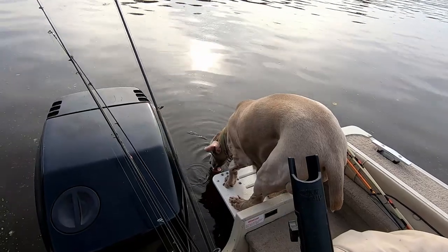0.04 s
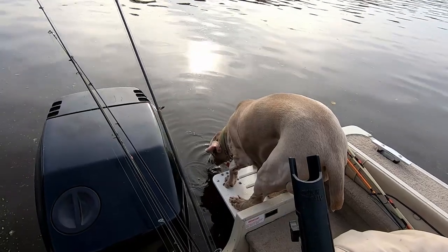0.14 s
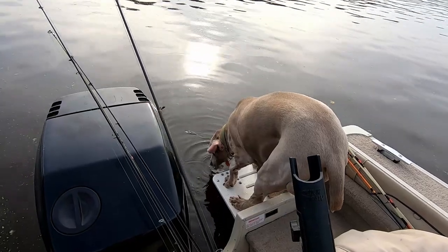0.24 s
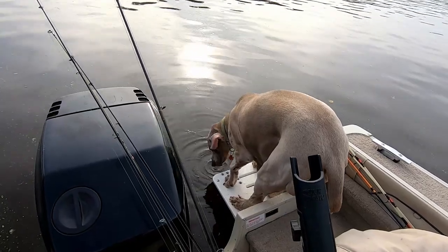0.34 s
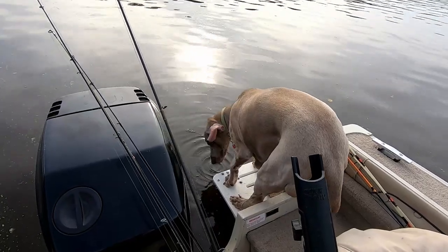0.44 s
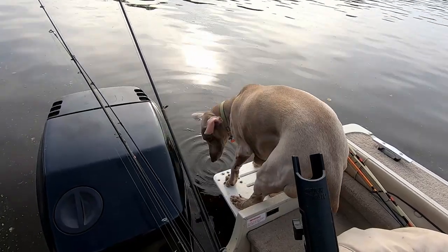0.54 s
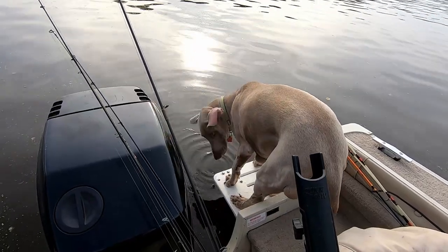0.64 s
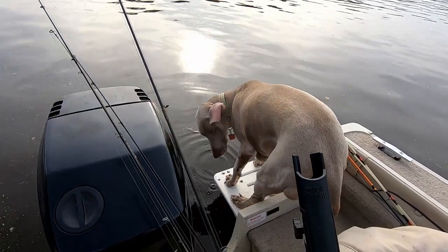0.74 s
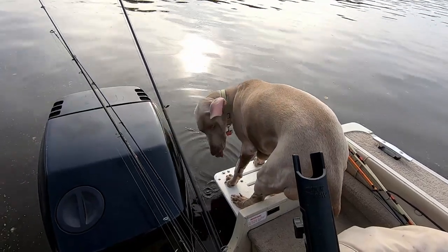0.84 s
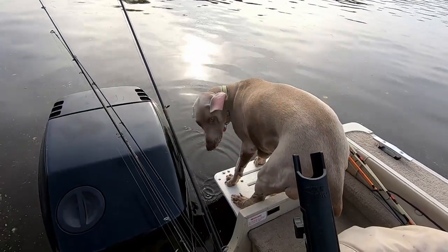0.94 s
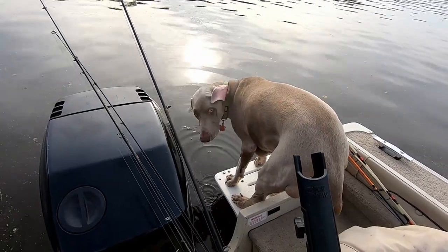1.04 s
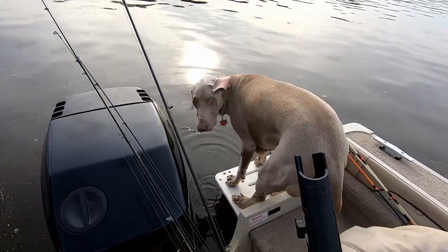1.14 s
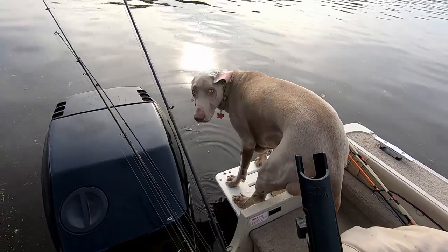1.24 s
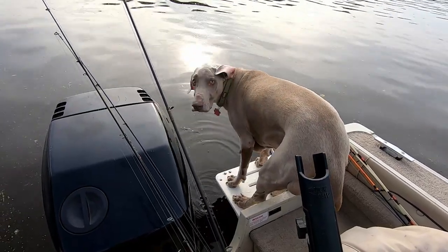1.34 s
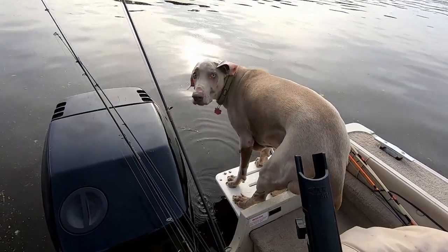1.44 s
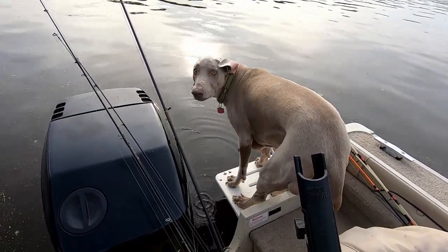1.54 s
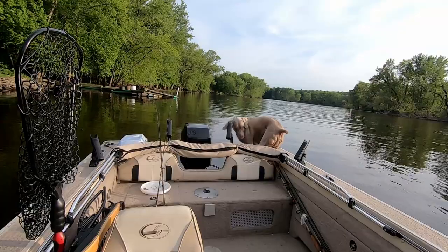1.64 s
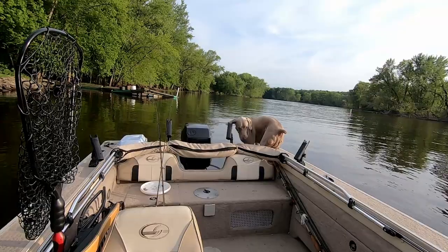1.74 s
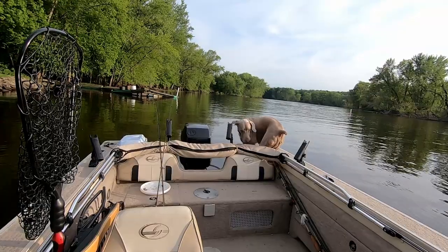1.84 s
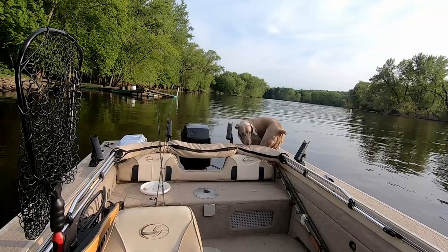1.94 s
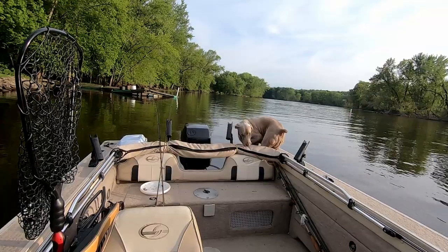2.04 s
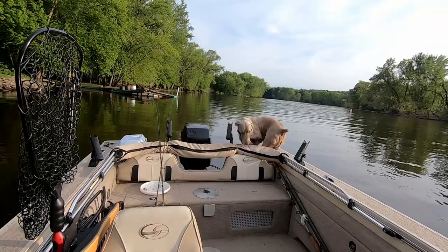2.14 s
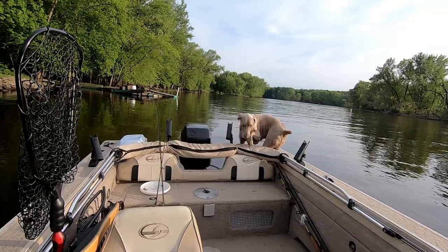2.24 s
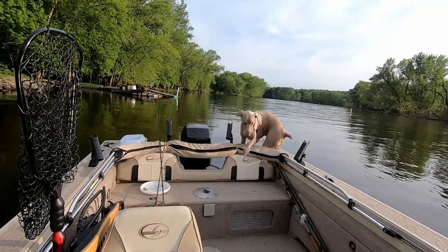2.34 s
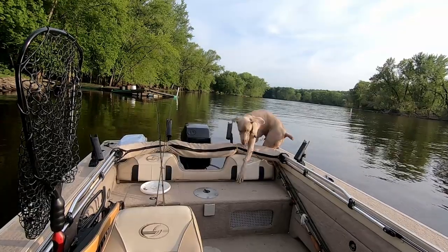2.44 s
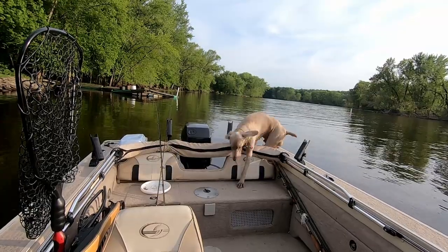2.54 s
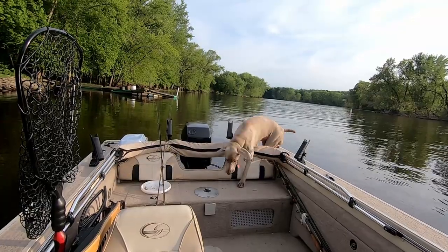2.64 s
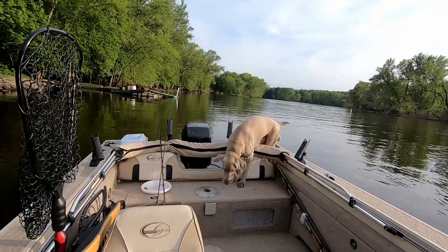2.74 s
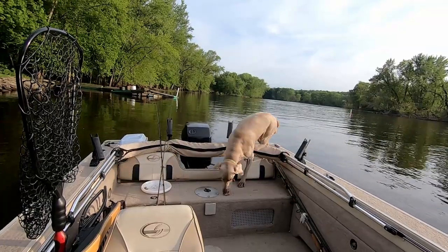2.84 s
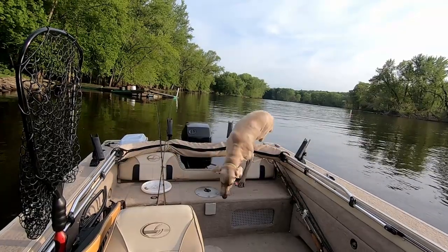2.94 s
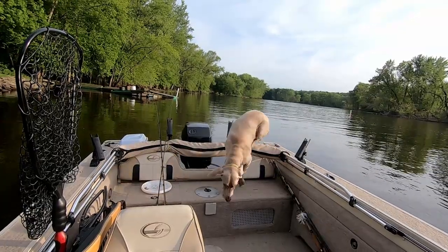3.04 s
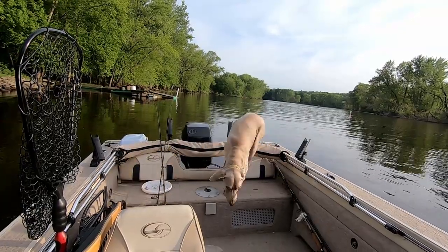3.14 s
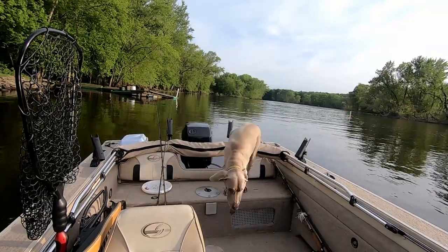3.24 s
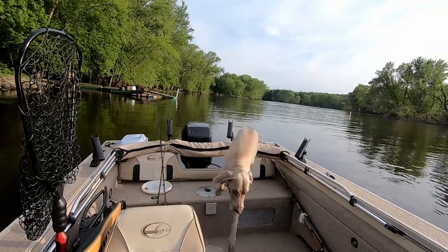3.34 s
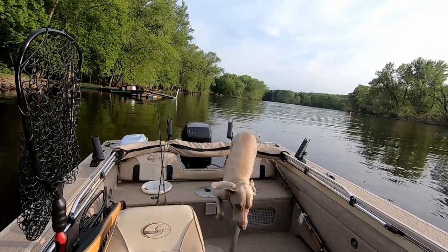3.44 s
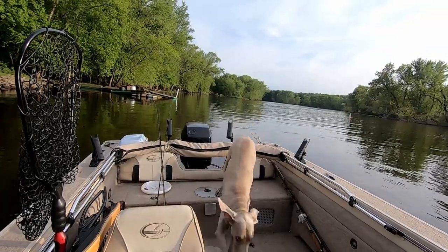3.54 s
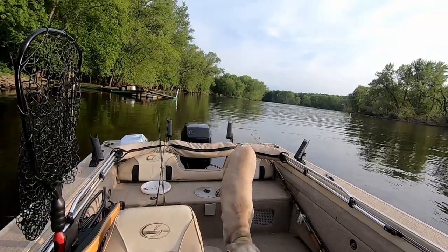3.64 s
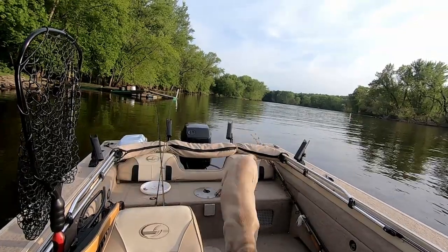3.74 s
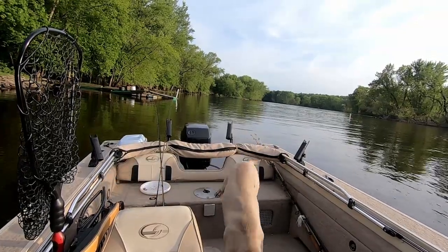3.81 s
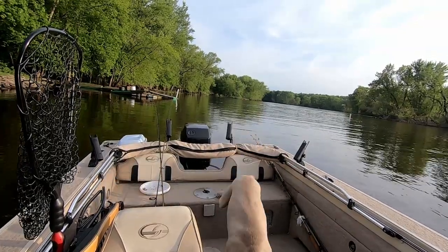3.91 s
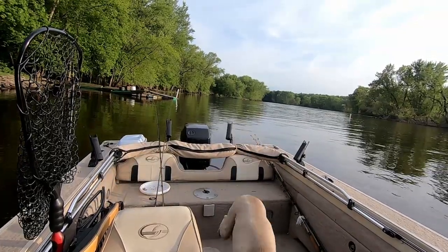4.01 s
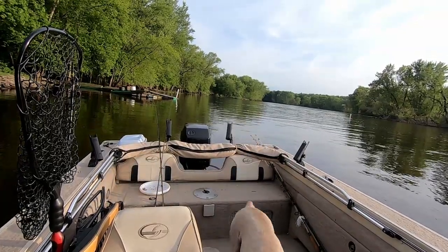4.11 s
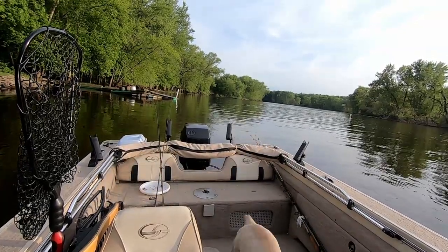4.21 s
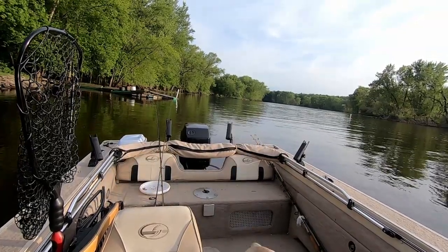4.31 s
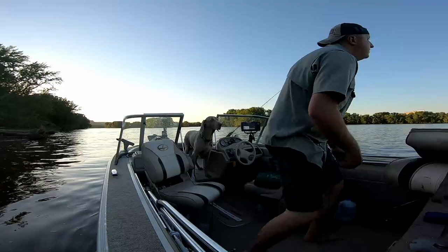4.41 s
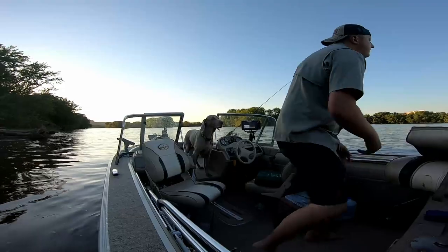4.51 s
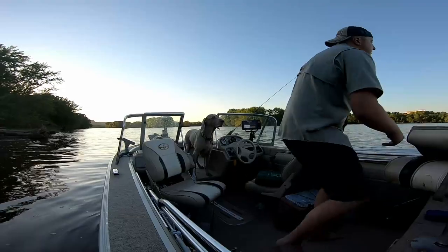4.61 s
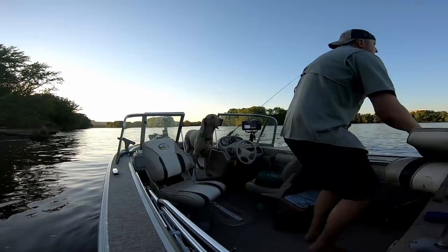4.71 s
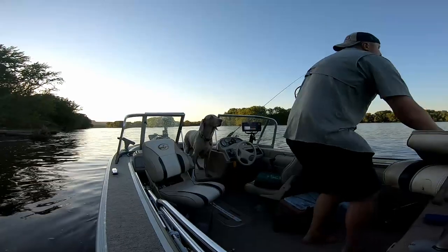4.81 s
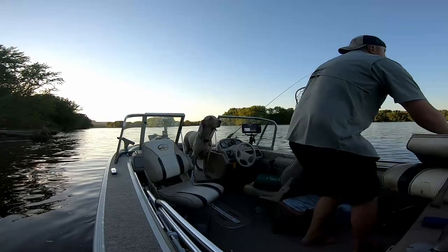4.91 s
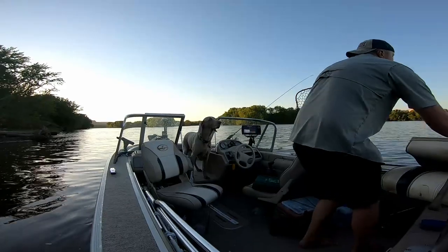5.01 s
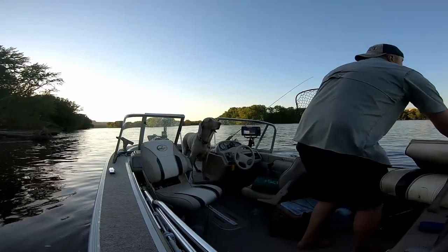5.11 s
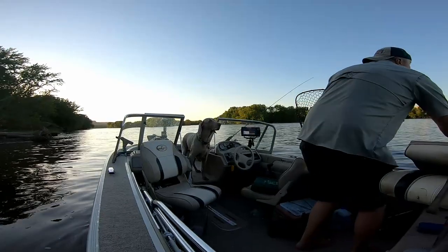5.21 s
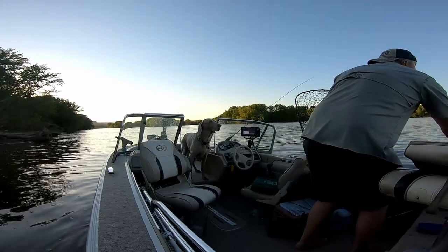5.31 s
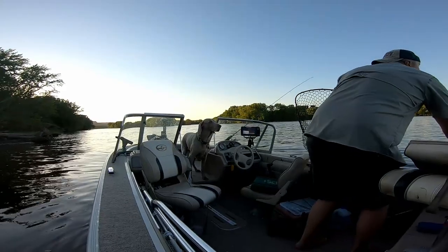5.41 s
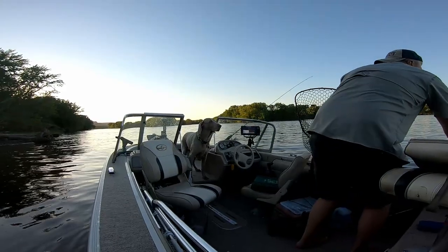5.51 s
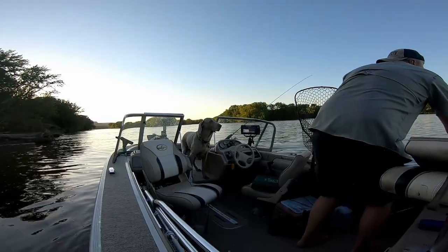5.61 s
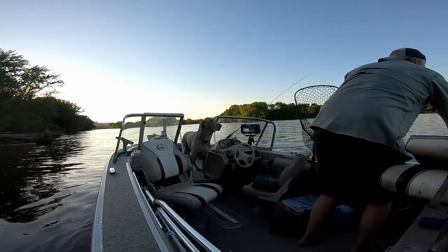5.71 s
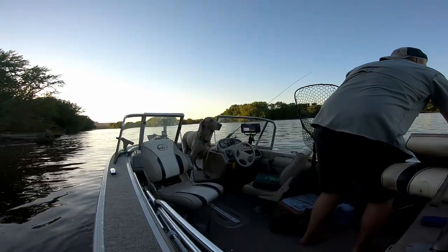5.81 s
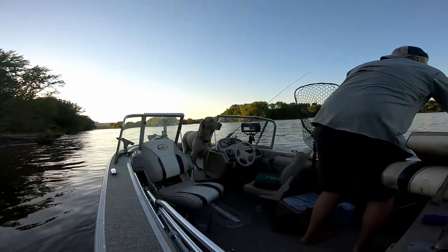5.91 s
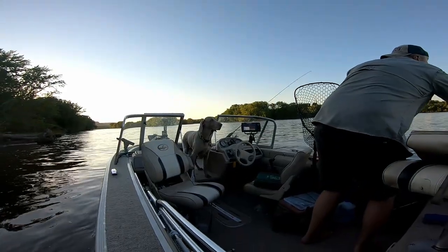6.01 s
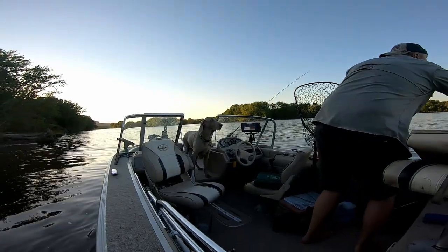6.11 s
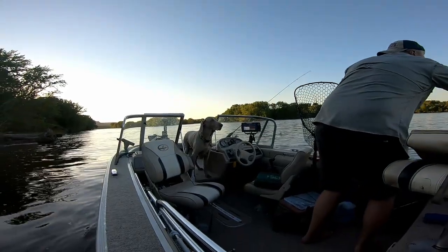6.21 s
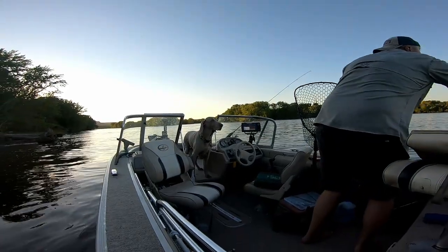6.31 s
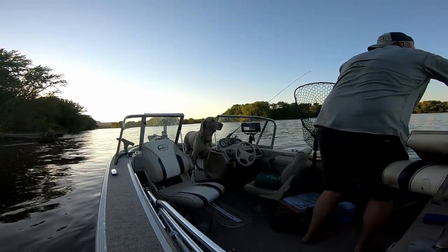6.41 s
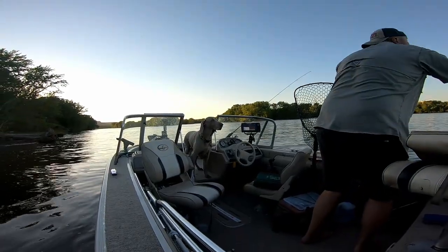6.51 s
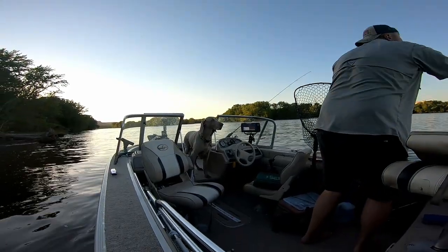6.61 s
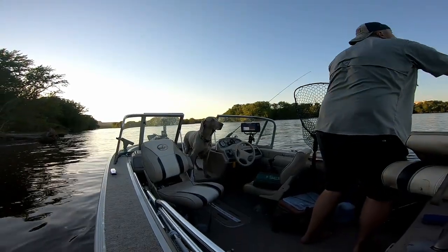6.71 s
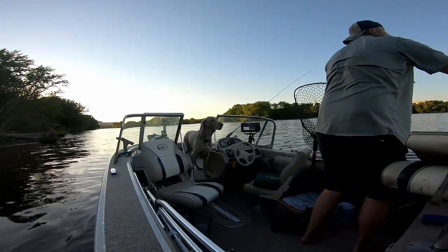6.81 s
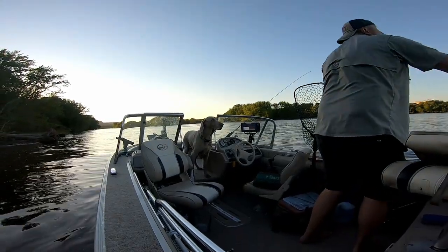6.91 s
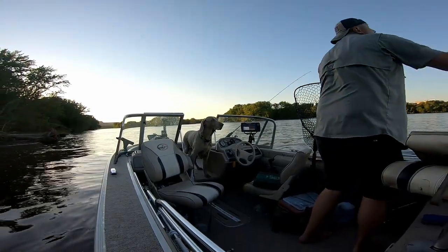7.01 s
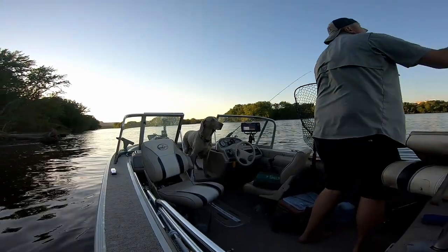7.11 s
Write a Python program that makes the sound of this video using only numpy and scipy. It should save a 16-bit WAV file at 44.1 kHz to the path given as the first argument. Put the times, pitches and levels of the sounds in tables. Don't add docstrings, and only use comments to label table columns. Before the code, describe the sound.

Three outdoor river places heard in turn from a microphone at arm's length: first wet lapping, bubbles and trickling drips over a soft distant engine; then birds, faint frogs, tag chinks, and a dog jumping down with a burst of bright claw ticks, scrapes and hollow thumps; finally a louder low engine hum through the hull, with water wash and little else.

```python
import sys
import numpy as np
from scipy import signal
from scipy.fft import rfft, irfft, next_fast_len
from scipy.io import wavfile
from scipy.ndimage import uniform_filter1d, map_coordinates

SR = 44100
rng = np.random.default_rng(int(sys.argv[2]) if len(sys.argv) > 2 else 0)


def pcm_store(signal):
    levels = np.round(np.clip(np.atleast_2d(signal), -1, 1) * 32767)
    wavfile.write(sys.argv[1], SR, levels.astype(np.int16).T)


def gain_from_db(level_db):
    decades = np.asarray(level_db, float) / 20
    return 10 ** decades


N = 315315

# [s] stern to cove, [s] cove to bow.
CUTS = (1.612, 4.445)


def evened(x):
    return x / np.sqrt(np.mean(x ** 2) + 1e-20)


def curve(rows, column=1):
    return np.interp(np.arange(N) / SR, [r[0] for r in rows], [r[column] for r in rows])


def read(points, hz):
    f, value = np.transpose(points)
    return np.interp(np.log(hz + 1), np.log(f + 1), value)


def span(start_s, end_s):
    return slice(max(round(start_s * SR) - 500, 0), min(round(end_s * SR) + 500, N))


def between(start_s, end_s):
    t = np.arange(N) / SR
    return np.clip(np.minimum(t - start_s, end_s - t) / 0.0042 + .5, 0, 1)


def add(mix, s, sound, pan_db, spread=0., size=0):
    part = mix[:, round(s * SR):][:, :len(sound)]
    fade = gain_from_db(-60 * np.arange(200) / SR / 0.0042)
    walls = rng.standard_normal((2, 200)) * fade
    direct = np.arange(200) == [[size], [0]]
    walls = spread * walls / np.linalg.norm(walls[0]) + direct
    pair = signal.fftconvolve(sound[None], walls, axes=1) * gain_from_db([[pan_db / 2], [-pan_db / 2]])
    part += pair[:, :part.shape[1]] / np.sqrt(1 + spread ** 2)


def bandpass(lo_hz, hi_hz):
    return signal.butter(2, [lo_hz, min(hi_hz, .49 * SR)], "band", fs=SR, output="sos")


def band(x, lo_hz, hi_hz):
    return signal.sosfilt(bandpass(lo_hz, hi_hz), x)


def steep(x, lo_hz, hi_hz):
    once = bandpass(lo_hz, hi_hz)
    return evened(signal.sosfilt(np.vstack([once, once]), x))


def wander(per_s):
    steps = rng.standard_normal(int(N / SR * per_s) + 9)
    coarse = np.arange(0, N + 64, 64)
    smooth = map_coordinates(steps, [coarse / SR * per_s + 2], order=3)
    return np.interp(np.arange(N), coarse, evened(smooth))


def grains(per_s, size_db, count):
    sizes = gain_from_db(size_db * np.minimum(rng.exponential(1, count), 4))
    sizes = sizes * (rng.random(count) < per_s / SR)
    shared, own = rng.standard_normal(count), rng.standard_normal((2, count))
    return (shared + 3.8 * own) * sizes


def bubble(hz, splash_db, t60):
    t = np.arange(2000) / SR
    noise = rng.standard_normal((2, len(t)))
    clear = np.clip(600 / hz, 0, .8)
    tone = clear * np.sin(2 * np.pi * hz * (t + 1.2 * t ** 2))
    tone = tone + (1.2 - clear) * steep(noise[0], .91 * hz, 1.1 * hz)
    swell = np.minimum(t * hz / 2.6, 1) ** 1.9
    splash = gain_from_db(splash_db + 8.0) * steep(noise[1], 610, 5730) * gain_from_db(-60 * t / 0.24)
    fall = gain_from_db(-60 * t / np.clip(t60, .01, .4)) * np.minimum(t / 0.0018, 1)
    broken = gain_from_db(4.0 * (1 - clear) * evened(uniform_filter1d(noise[1], size=70)))
    sound = (tone * swell + splash) * fall * broken
    return sound / abs(sound).max()


# start in [s], peak in [dB], bubble pitch in [Hz].
LAPS = [(0.167, -36.5, 690), (0.182, -42, 574), (0.231, -42, 640), (0.262, -49, 704), (0.548, -41.5, 1320),
        (0.554, -40.5, 3140), (0.628, -42.5, 3080), (0.703, -37, 3540), (0.754, -53, 603),
        (0.88, -46.5, 560), (1.005, -48, 2000), (1.044, -45.5, 595), (1.169, -32.5, 3400),
        (1.183, -43.5, 3810), (1.511, -41, 2900), (1.569, -44.5, 690)]
# start in [s], peak in [dB],
# bubble pitch in [Hz].
DROPS = [(0.078, -45, 1330), (0.314, -32, 1268), (0.326, -33.5, 3240), (0.486, -47.5, 3740),
         (0.586, -40.5, 3140), (0.68, -42.5, 3130), (0.964, -47, 2170), (1.022, -43.5, 820),
         (1.105, -45.5, 3480), (1.118, -52, 3480), (1.06, -51, 595), (1.11, -45.5, 590), (1.135, -51, 570),
         (1.045, -51, 2170), (1.05, -50, 3300), (1.075, -49, 3200), (1.207, -40.5, 2370),
         (1.281, -36.5, 764), (1.418, -47.5, 2390), (1.501, -40.5, 3330), (1.539, -44, 2750),
         (0.004, -54, 1180), (0.092, -50.5, 1510), (0.153, -50, 1240), (0.196, -58, 2100),
            (0.267, -48, 4070), (0.2884, -52, 3460), (0.329, -46, 2180), (0.503, -60, 1200),
            (0.541, -50, 1040), (0.554, -47, 6200), (0.598, -44, 2840), (0.65, -64, 9500),
            (0.709, -52, 1180), (0.709, -46, 6200), (0.731, -54, 2370), (0.751, -51, 7440),
            (0.855, -56, 1270), (0.87, -56, 930), (1.034, -46, 1460), (1.07, -52.5, 1270),
            (1.094, -49, 3470), (1.11, -53, 1380), (1.131, -59, 1350), (1.19, -52, 1480),
            (1.231, -53, 1230), (1.255, -53, 2100), (1.262, -56, 4770), (1.292, -48, 1260),
            (1.5, -53, 1220), (1.525, -56, 720), (1.599, -52.5, 2480)]
# time in [s], level in [dB].
TRICKLE = [(0, -68.5), (.14, -67.5), (.2, -63), (.36, -63), (.52, -69), (.6, -56), (.66, -62.5), (.85, -59),
           (.98, -59.5), (1.03, -58), (1.14, -60), (1.22, -62), (1.32, -79), (1.48, -75), (1.52, -58.5),
           (1.6, -60)]


def water():
    out, t, count = np.zeros((2, N)), np.arange(900) / SR, 2 * SR
    for rows, splash_db in ((LAPS, -6), (DROPS, -38)):
        for s, db, hz in rows:
            t60 = 0.065 * min(1300 / hz, 1) ** 0.33
            add(out, s, gain_from_db(db) * bubble(hz, splash_db, t60), -.8, .3)
    trickle, drops, kind = np.zeros((2, count)), grains(2500, 3.5, count), rng.integers(0, 32, count)
    for k, hz in enumerate(np.geomspace(450, 7500, num=32) * 0.85):
        fizz = np.sin(2 * np.pi * hz * (t + 4.2 * t ** 2)) * t * hz * np.exp(-t * hz / 4.3)
        fizz *= (hz / 3000) ** 0.2
        trickle += signal.oaconvolve(drops * (kind == k), fizz[None])[:, :count]
    hiss = rng.standard_normal(count) + .5 * rng.standard_normal((2, count))
    rustle = steep(hiss, 1300, 5600) * gain_from_db(-1.5 + 3.4 * wander(59.94))[:count]
    flow = gain_from_db(curve(TRICKLE) - 5.5) * between(-1, CUTS[0])
    out[:, :count] += (evened(trickle) + rustle) * flow[:count]
    return out


def claw(hz, treble_db):
    t = np.arange(2600) / SR
    noise = rng.standard_normal((3, len(t))) + 4. * (t == 0)
    luck = rng.standard_normal((5, 2))
    pitches = hz * np.array([.7, .9, 1, 1.2, 1.45]) * (1 + .04 * luck[:, 1])
    sines = np.sin(2 * np.pi * np.outer(np.clip(pitches, 1000, 9000), t))
    modes = (gain_from_db(1.5 * luck[:, 0]) * [.6, .8, 1.2, .7, .5]) @ sines
    body = evened(modes) * gain_from_db(-60 * t / 0.075)
    body += gain_from_db(-3.0) * steep(noise[0], min(0.51 * hz, 1700), min(2.42 * hz, 7000))
    body += gain_from_db(treble_db - 9.0) * steep(noise[1], 7000, 15000) * np.minimum(t / 0.006, 1)
    body += gain_from_db(-15) * steep(noise[2], 670, 1910) * np.minimum(t / 0.0047, 1)
    rattle_db = 3.2 * evened(uniform_filter1d(noise[2], size=60))
    fall = gain_from_db(-60 * t / 0.016) + gain_from_db(-8.5 - 60 * t / 0.085 + rattle_db)
    sound = body * fall * np.minimum(t / 0.0006, 1)
    return sound / abs(sound).max()


# start in [s], peak
# in [dB], brightest pitch in [Hz].
CLAWS = [(2.7756, -37.5, 1520), (2.794, -32, 3520), (2.8209, -31, 2230), (2.83, -31.5, 3140),
         (2.845, -34.5, 2340), (2.852, -36, 3200), (2.879, -29.5, 3150), (2.904, -19, 3540),
         (2.944, -32, 4550), (2.9634, -12.5, 3710), (2.969, -18, 3120), (2.991, -20.5, 3200),
         (2.999, -16.5, 4070), (3.0091, -17.5, 2970), (3.019, -23, 2390), (3.0302, -21.5, 3580),
         (3.06, -30, 1780), (3.1067, -24, 2050), (3.141, -35, 2570), (3.1555, -10, 5560),
         (3.1754, -19, 3125), (3.1796, -20.5, 2400), (3.2124, -19, 5640), (3.217, -22.5, 2520),
         (3.233, -20, 3365), (3.2972, -21, 4110), (3.3466, -23, 4100), (3.3613, -25.5, 3160),
         (3.399, -24.5, 2840), (3.4278, -33.5, 3500), (3.462, -33, 3200),
         (2.394, -42, 2400), (2.477, -40, 3050), (2.5238, -45, 3350), (3.51, -42.5, 2980),
         (3.5631, -35, 3520), (3.7592, -41, 2890), (4.065, -36, 1400), (4.2054, -27, 2500),
         (4.293, -57, 890),
         (1.777, -48, 3010), (2.362, -44.5, 4330), (2.635, -59, 6000), (2.764, -51, 3830),
           (2.886, -28, 4600), (2.912, -30, 4460), (2.984, -20.5, 2860), (3.04, -29, 2810),
           (3.089, -37, 3080), (3.172, -32, 3500), (3.187, -36, 3000), (3.248, -24, 4030),
           (3.304, -24.5, 2660), (3.321, -38, 4520), (3.337, -37, 2320), (3.349, -30, 2530),
           (3.377, -35, 3450), (3.407, -30.5, 2790), (3.438, -36.5, 2960), (3.493, -44, 4000),
           (3.548, -42.5, 1490), (3.695, -52, 6700), (3.706, -45, 6160), (4.029, -46, 5770),
           (4.136, -48.5, 3930), (4.222, -51, 4000), (4.256, -46, 6560), (4.435, -52, 7550)]
# start in [s], peak in [dB], brightest pitch in [Hz].
TACKLE = [(4.576, -51, 4900), (4.96, -57, 5500), (5.0, -55, 4510), (5.19, -51, 5060), (5.8777, -46.5, 4400),
          (6.47, -58, 5000)]
# time in [s], level in [dB].
SCRAPE = [
    [(2.74, -56), (2.85, -48), (2.93, -50.5), (3.02, -38.5), (3.08, -53), (3.2, -41.5), (3.28, -58),
     (3.37, -55.5), (3.53, -78)],
    [(3.95, -69), (3.98, -50), (4.07, -60), (4.16, -58)],
    [(4.3, -62), (4.4, -70), (4.425, -55.5), (4.445, -53.5)],
]
# frequency in [Hz], level in [dB per Hz].
DECK = [(290, -25), (500, 1), (657, -6), (792, 1), (1510, 1), (5920, -15.5), (12000, -34), (15500, -44.5)]
# frequency in [Hz], level in [dB].
PORT_DB = [(200, -2), (380, 0.5), (700, -8.5), (1290, -9.5), (2380, -6.5), (4400, -3), (8120, -5),
           (15000, -1)]
# frequency in [Hz], lead in [radians].
PORT_LEAD = [(300, 0), (780, 0.4), (1290, 2), (1810, 1.0), (2670, 0.54), (3960, -0.15), (5000, -1.56),
             (7320, -1), (9990, -2.5)]


def claws():
    count = next_fast_len(round(CUTS[1] * SR) + 2000)
    out = np.zeros((2, N))
    for s, db, hz in CLAWS:
        treble_db = -15.5 - 12 * (s - 3)
        add(out, s, gain_from_db(db) * claw(hz, treble_db), 0, .4)
    ring = rng.standard_normal(600) * gain_from_db(-60 * np.arange(600) / SR / 0.0074)
    rubs = grains(600, 3.2, count) + 0.42 * grains(2900, 3.0, count)
    rubbing = signal.oaconvolve(rubs, ring[None])[:, :count]
    hz = np.fft.rfftfreq(count, 1 / SR)
    slide = evened(irfft(rfft(rubbing) * gain_from_db(read(DECK, hz)), count))
    nails = steep(rubbing, 1500, 7450)
    slide += gain_from_db(-8.0) * nails * between(0, 3.6)[:count]
    stroke = sum(gain_from_db(curve(rows)) * between(rows[0][0], rows[-1][0]) for rows in SCRAPE)
    port = gain_from_db(read(PORT_DB, hz) / 2) * np.exp(.5j * read(PORT_LEAD, hz))
    out[:, :count] = irfft(rfft(out[:, :count] + slide * stroke[:count]) * [port, 1 / port], count)
    for s, db, hz in TACKLE:
        add(out, s, gain_from_db(db) * claw(hz, treble_db=-10.5), 0)
    return out


# start in [s], peak in [dB], panel pitch in [Hz],
# hull boom in [dB], slap in [dB].
PAWS = [(2.587, -29.5, 126, 8, -8), (2.602, -25.5, 143.3, 10, -36), (2.817, -35.5, 150, 0, -2.5),
        (2.985, -18.5, 135.4, -7, -11.5), (3.03, -29.5, 166.4, 0, -17), (3.07, -34, 173, -2, -5),
        (3.128, -13.5, 134, -16, -33), (3.191, -28.5, 116, 1, -6), (3.295, -18.5, 104, 3, -17.5),
        (3.552, -13, 100, 1.5, -24), (3.595, -21, 94, 11, -3.5), (3.705, -20, 115, 4.5, -21),
        (3.741, -30, 92.7, -11, -44), (4.043, -27.5, 113, 6, -10.5), (4.062, -26, 122, 12, -7),
        (4.079, -29.5, 94, 15, -32), (4.145, -19, 91, 4.5, -22), (4.291, -16.5, 142, 6.5, -18.5),
        (4.367, -32, 92, 0, -21), (4.813, -25.5, 194.5, -11, -27)]
# pitch in [Hz], level in [dB], t60 in [s].
HULL = [(38.8, -3, 0.27), (53.3, 1.5, 0.31), (76.2, -0.5, 0.31), (108.8, 1, 0.12)]
# time in [s], level in [dB].
ROCKING = [(2.5, -52), (2.75, -36.5), (2.95, -25), (3.12, -32.5), (3.25, -40.5), (3.9, -40), (4.44, -28)]


def paws():
    out, t = np.zeros((2, N)), np.arange(SR // 2) / SR
    for s, db, hz, boom_db, slap_db in PAWS:
        t60 = 0.14 * gain_from_db(-0.44 * (db + 21.5))
        turns = hz * (t + 0.26 * 0.018 * (1 - np.exp(-t / 0.011)))
        onset = np.sin(np.pi / 2 * np.minimum(t / 0.005, 1)) ** 2
        panel = np.sin(2 * np.pi * turns) * gain_from_db(-60 * t / max(t60, .02)) * onset
        boom = sum(gain_from_db(d - 60 * t / ring) * np.sin(2 * np.pi * (f * t + rng.random())) for f, d, ring in HULL)
        boom = boom * np.minimum(t / 0.037, 1)
        knock = rng.standard_normal(len(t)) * gain_from_db(-60 * t / 0.069) * np.minimum(t / 0.0013, 1)
        thud = rng.standard_normal(len(t)) * gain_from_db(-60 * t / 0.12) * np.minimum(t / 0.003, 1)
        slap = band(knock, 355, 760) + 1.27 * band(thud, 170, 398)
        lid = np.sin(2 * np.pi * 580 * t) * gain_from_db(-60 * t / 0.09) * np.minimum(t / 0.002, 1)
        slap = slap / abs(slap).max() + 0.7 * lid
        blow = panel + gain_from_db(boom_db - 7.5) * boom + gain_from_db(slap_db + 2.0) * slap
        add(out, s, gain_from_db(db) * blow, -.8, .15)
    rock = band(rng.standard_normal((2, N)), 18.8, 38)
    rock_db = curve(ROCKING) - 0.5 + np.array([[-3.5], [3.5]])
    rock = evened(rock[0] + 3.5 * rock) * gain_from_db(rock_db)
    return out + rock * between(ROCKING[0][0], CUTS[1])


# start in [s], peak in [dB].
TAG = [(0.815, -30), (0.8295, -36), (1.643, -47), (2.164, -38), (2.183, -33.5), (2.197, -36), (2.21, -31.5),
       (2.222, -37), (2.3432, -37), (2.385, -38.5), (2.4285, -37), (2.456, -38), (2.546, -36.5),
       (2.552, -45)]
# pitch in [Hz], level in [dB], t60 in [s].
TAG_MODES = [(3560, -1, 0.22), (6200, 9, 0.094), (7730, -6, .08), (8600, -27, 0.056), (6630, -11, 0.18),
             (9870, 0, 0.2), (11500, -1.5, 0.14), (13100, -35, 0.096), (14200, -36, 0.46),
             (14300, -31, 0.13)]


def tag():
    out, t = np.zeros((2, N)), np.arange(5000) / SR
    for s, db in TAG:
        luck = rng.standard_normal((len(TAG_MODES), 2))
        free = .45 if s < CUTS[0] else .22
        ring = sum(gain_from_db(d + 3.0 * a - 60 * t / min(t60, .12) / free)
                   * np.sin(2 * np.pi * hz * (1 + 0.0098 * b) * t)
                   for (hz, d, t60), (a, b) in zip(TAG_MODES, luck))
        rattle = steep(rng.standard_normal(len(t)), 2700, 16000)
        rattle = rattle * gain_from_db(-9.5 - 60 * t / 0.073) * np.minimum(t / 0.0027, 1)
        add(out, s, gain_from_db(db - 1.5) * (ring / abs(ring).max() + rattle), -2, .8, size=2)
    return out


# start in [s], peak in [dB].
JINGLES = [(2.775, -57), (2.8206, -40.5), (2.9444, -53), (2.9638, -34), (3.0, -40), (3.045, -53),
           (3.1554, -39), (3.2123, -52), (3.2332, -55), (3.2976, -52), (3.321, -52), (3.347, -44),
           (3.379, -57), (3.438, -60), (3.462, -60)]
# pitch in [Hz], level in [dB], t60 in [s].
JINGLE_MODES = [(8890, 5, .06), (10100, -10, .08), (10640, -5.5, 0.078), (11600, 0, 0.14), (12400, 2, .08),
                (14300, -12, .45)]


def jingle():
    out, t = np.zeros((2, N)), np.arange(6000) / SR
    for s, db in JINGLES:
        luck = rng.standard_normal((len(JINGLE_MODES), 2))
        ring = sum(gain_from_db(d - 2.0 + 4.0 * a - 60 * t / t60 / .55)
                   * np.sin(2 * np.pi * hz * (1 + 0.013 * b) * t)
                   for (hz, d, t60), (a, b) in zip(JINGLE_MODES, luck))
        ring += steep(rng.standard_normal(len(t)), 8200, 14000) * gain_from_db(5.5 - 60 * t / 0.076)
        add(out, s, gain_from_db(db - 9.5) * ring * np.minimum(t / .004, 1), -1.5, .9, size=1)
    return out


# time in [s], fifth order in [Hz], its level in [dB].
FAR_MOTOR = [(0.0, 148.7, -44), (1.61, 148.8, -41)]
# order of the firing rate, level in [dB].
FAR_ORDERS = [(2, -13), (2.45, -9), (3, -7.5), (4, -10), (5, 3), (7.35, -18.5), (8, -22)]
# time in [s], fifth order in [Hz], its level in [dB].
NEAR_MOTOR = [(4.46, 164.4, -28), (4.95, 164.8, -28.5), (5.4, 165.1, -23.5), (6.6, 164.5, -24),
              (6.8, 161.2, -26.5), (7.15, 158.3, -22.5)]
# order of the firing rate, level in [dB].
NEAR_ORDERS = [(1.2, -12), (2, -9), (2.4, -13.5), (3, -8), (4, -20.5), (5, 0.5), (6, -15.5), (6.83, -10.5),
               (8, -35.5), (10, -24.5), (11, -30.5), (14, -29.5), (17, -35.5)]


def motor(run, orders, part, waver_db, throb_db):
    turns = (np.cumsum(curve(run)) / 5 / SR)[part]
    out = np.zeros(N)
    for k, db in orders:
        drift = wander(9.)[part]
        sway_db = (throb_db if k == 5 else waver_db) * wander(12.)[part]
        phase = 2 * np.pi * (k * turns + rng.random()) + (k != 5) * 0.99 * drift
        out[part] += gain_from_db(db + sway_db) * np.sin(phase)
    return np.sqrt(2) * gain_from_db(curve(run, column=2)) * out


def whistle(rows, broken_db=6.0):
    s, hz, db = np.transpose(rows)
    t = np.arange(s[0], s[-1], 1 / SR)
    wobble = uniform_filter1d(rng.standard_normal((2, len(t))), size=150, axis=1)
    flutter = gain_from_db(np.interp(t, s, db) - 2 + broken_db * evened(wobble[0]))
    pitch_hz = np.interp(t, s, hz) * (1 + .0014 * broken_db * evened(wobble[1]))
    note = flutter * np.sin(2 * np.pi * np.cumsum(pitch_hz) / SR) * signal.windows.tukey(len(t), .3)
    banks = rng.standard_normal(9000) * gain_from_db(-60 * np.arange(9000) / SR / .3)
    direct = np.arange(9000) == 0
    return signal.fftconvolve(note, 0.4 * banks / np.linalg.norm(banks) + direct)


# start in [s], length in [s], from [Hz], to [Hz], top in [dB].
BIRDS = [(1.678, 0.042, 4340, 3760, -52), (1.813, 0.047, 3390, 2950, -57), (1.871, 0.033, 4060, 4670, -54),
         (1.899, 0.017, 3710, 4460, -54), (1.917, 0.025, 3630, 4030, -54), (1.914, 0.066, 3310, 2970, -56),
         (2.096, 0.064, 3700, 3820, -56.5), (2.144, 0.035, 3480, 3100, -58),
         (2.183, 0.051, 3720, 3510, -55), (2.247, 0.059, 3030, 3060, -57), (2.416, 0.052, 3950, 3480, -57),
         (2.469, 0.026, 3040, 3040, -60), (2.743, 0.075, 4060, 3460, -50.5), (2.604, .03, 3300, 3200, -65),
         (1.722, 0.013, 4000, 3670, -55), (1.971, 0.0203, 3360, 3000, -58),
         (3.971, 0.077, 4020, 3540, -54.5), (4.003, .02, 2650, 3100, -56), (4.02, 0.045, 3170, 2800, -53),
         (4.367, 0.0086, 1540, 1220, -46.5), (5.079, 0.097, 2523, 2410, -52.5),
         (6.332, 0.027, 5300, 5600, -62.5), (6.35, 0.2, 5580, 5480, -77)]
# time in [s], pitch in [Hz], level in [dB].
WARBLE = [(3.792, 2450, -47), (3.813, 4560, -58), (3.832, 4630, -59), (3.846, 3500, -45.5),
          (3.86, 3250, -63), (3.882, 2980, -56), (3.9, 3490, -51), (3.91, 3050, -53), (3.943, 2970, -72)]
# time in [s], pitch in [Hz], level in [dB].
TRILL = [(0, 6010, 10), (.014, 7100, -1), (.035, 6850, -3.5), (.09, 6930, -12)]
# time in [s], level in [dB].
FROGS = [(2.7, -63.5), (4.44, -88.5)]


def wildlife():
    out, pan_db, ends_db = np.zeros((2, N)), 1.5, -2.5
    for s, length, from_hz, to_hz, db in BIRDS:
        arch = [(0, from_hz, ends_db), (length / 2, (from_hz + to_hz) / 2, 0), (length, to_hz, ends_db)]
        wide = s < CUTS[1]
        add(out, s, gain_from_db(db) * whistle(arch, 1.5 + 3.5 * wide), pan_db * wide, .2 * wide)
    add(out, WARBLE[0][0], whistle(WARBLE, broken_db=3.0), pan_db, .4)
    for k in range(9):
        note_db = -56.5 - 4.0 - 0.19 * k
        add(out, 1.6 + k * .0942, gain_from_db(note_db) * whistle(TRILL, broken_db=5.5), -2, .5)
    chorus = steep(rng.standard_normal((2, N)), 1635, 1944)
    chorus = evened(chorus[0] + .6 * chorus) * gain_from_db(curve(FROGS) + 1.2 * wander(30.))
    return out + chorus * between(*CUTS)


# time in [s], level in [dB].
SPRAY = [(4.44, -85), (4.9, -81.5), (5.2, -73.5), (5.5, -77), (6.2, -84.5), (6.45, -78), (6.65, -84),
         (7.15, -76.5)]


def spray(part):
    out = np.zeros(N)
    out[part] = steep(rng.standard_normal(part.stop - part.start), 3000, 9500)
    return out * gain_from_db(curve(SPRAY) + 1.5 * wander(25.))


# a spectrum of [Hz] and [dB per Hz], the rms in [dB],
# then rows of frequency in [Hz] and left-right likeness from 0 to 1.
STERN_AIR = [(15, -45.5), (25, -19), (53, -6.5), (162, -7), (179, -13.5), (209, -38), (249, -24),
             (283, -18.5), (604, -40.5), (1980, -52.5), (4450, -55), (5440, -65), (10500, -76),
             (13600, -115)], -41, [(60, 0.97), (380, 0.83), (2380, 0.22), (15000, 0.42)]
COVE_AIR = [(15, -32), (25, 0), (111, 3.5), (532, -22.5), (1580, -29.5), (1790, -24.5), (2490, -29),
            (3120, -25.5), (5310, -37), (6830, -38.5), (7750, -44.5), (10500, -55.5), (13600, -100),
            (22000, -120)], -42, [(60, 1), (380, 0.8), (2380, 0.13), (15000, 0.23)]
BOW_AIR = [(15, -38.5), (25, 0), (65, -1), (118, -5.5), (172, -8), (233, -12.5), (277, -15.5), (482, -22),
           (574, -27), (3300, -42.5), (10000, -78), (13000, -113)], -28, [(60, 1), (15000, 1)]
# time in [s], level in [dB].
STERN_SWELL = [(0, -1), (1.1, 0.5), (1.3, 1), (1.6, 2.5)]
COVE_SWELL = [(1.61, -2), (2.3, -3), (2.7, 0.5), (3.9, -4.5), (4.44, -0.5)]
BOW_SWELL = [(4.44, -2.5), (5.0, -1), (5.35, 2), (5.7, 0), (7.15, -4)]


def air(colour, level_db, same, swell, part, patchy_db=2.0):
    count, out = part.stop - part.start, np.zeros((2, N))
    frames, hz = count // 512 + 5, np.fft.rfftfreq(2048, 1 / SR)
    a, b, c, d, patches = rng.standard_normal((frames, 1025, 5)).T
    patches = uniform_filter1d(patches, size=16, axis=0)
    patches = evened(uniform_filter1d(patches, size=6, axis=1))
    like, left = np.clip(read(same, hz), -1, 1)[:, None], a + 1j * b
    right = like * left + np.sqrt(1 - like ** 2) * (c + 1j * d)
    z = np.array([left, right]) * gain_from_db(read(colour, hz)[:, None] + patchy_db * patches)
    out[:, part] = evened(signal.istft(z, nperseg=2048, noverlap=1536)[1][:, :count])
    return gain_from_db(level_db + curve(swell)) * out


def scene():
    first, second, third = span(0, CUTS[0]), span(*CUTS), span(CUTS[1], 9)
    stern = air(*STERN_AIR, STERN_SWELL, first) * gain_from_db(-4)
    stern = stern + motor(FAR_MOTOR, FAR_ORDERS, first, waver_db=3., throb_db=1.2)
    cove = air(*COVE_AIR, COVE_SWELL, second, patchy_db=1.3) * gain_from_db([[-1], [1]])
    bow = air(*BOW_AIR, BOW_SWELL, third, patchy_db=1.5)
    bow = bow + motor(NEAR_MOTOR, NEAR_ORDERS, third, waver_db=3., throb_db=.7) + spray(third)
    places = stern * between(-1, CUTS[0]) + cove * between(*CUTS) + bow * between(CUTS[1], 9)
    return places + water() + claws() + tag() + jingle() + paws() + wildlife()


def top_cut(x):
    return signal.sosfilt(signal.butter(12, 15870, fs=SR, output="sos"), x)


def record(dry):
    heard = signal.oaconvolve(band(dry, 24, 13000), signal.firwin(255, 15750, fs=SR)[None], "same")
    ending = np.sin(np.pi / 2 * np.minimum((N - np.arange(N)) / 400, 1)) ** 2
    return top_cut(heard * ending)


dry = scene()
out = record(dry)
pcm_store(out)
```